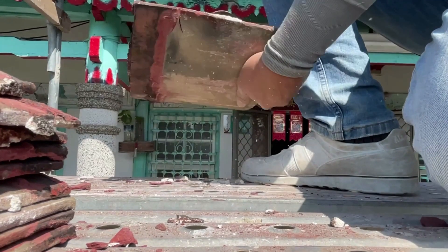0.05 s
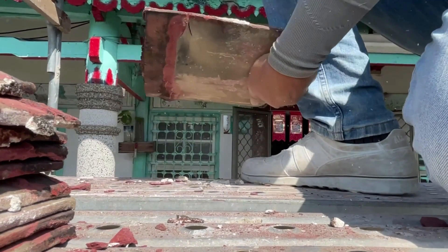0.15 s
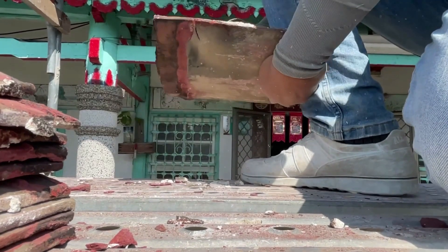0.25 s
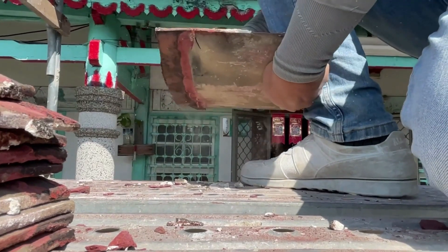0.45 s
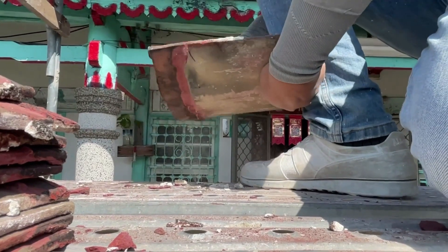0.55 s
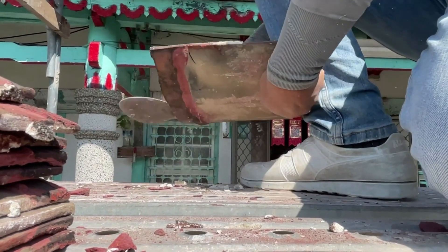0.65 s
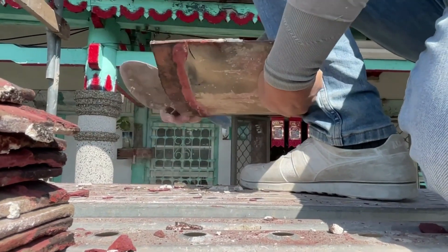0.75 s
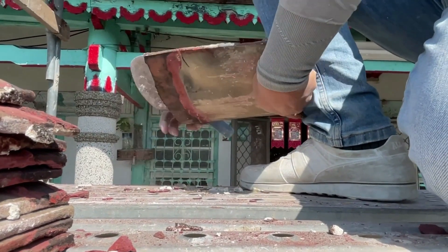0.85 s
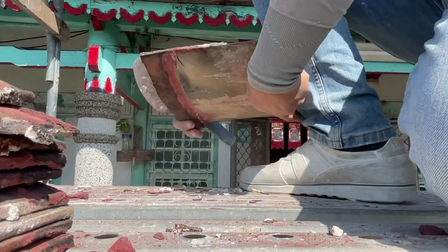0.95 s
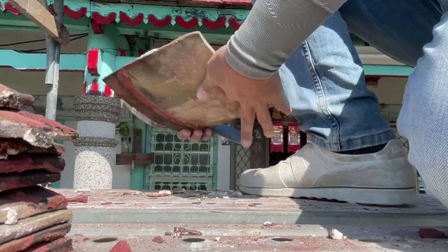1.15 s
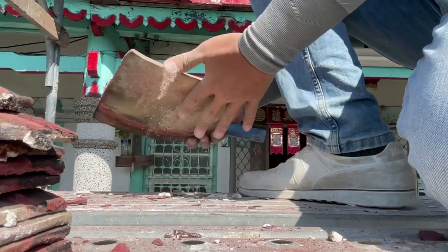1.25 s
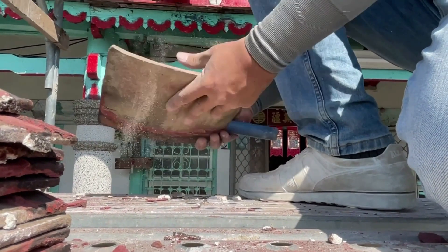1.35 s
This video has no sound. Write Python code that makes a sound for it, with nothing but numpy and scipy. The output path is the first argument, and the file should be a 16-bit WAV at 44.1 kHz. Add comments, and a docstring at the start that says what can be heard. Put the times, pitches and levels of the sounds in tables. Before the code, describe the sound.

On an open rooftop, clay tiles are handled close by, scraping and clacking with a brief thin ring. Then they rub more quietly while dull knocks come from the left, with a slight echo off nearby walls.

```python
"""Handling clay roof tiles

On an open roof, tiles are slid onto one another in the hands, close by. They scrape as grit
catches between them, and they clink: a short damped clack, then the thin ring of the free tile.
A shoe or cloth gives one low, soft scuff. Duller knocks and scrapes come from the left.
Nearby walls echo, over a low rumble of air."""
import sys
import numpy as np
from scipy import signal
from scipy.fft import rfft, irfft, next_fast_len
from scipy.io import wavfile

SR = 44100
rng = np.random.default_rng(int(sys.argv[2]) if len(sys.argv) > 2 else 0)


def log_audio(samples):
    """Write samples as a 16-bit WAV file to the path given in sys.argv[1]."""
    # one column per channel
    frames = np.atleast_2d(samples).T
    # limit to full scale, then quantise
    limited = np.clip(frames, -1, 1)
    pcm = np.round(limited * 32767).astype(np.int16)
    wavfile.write(sys.argv[1], SR, pcm)


N = 61739
FREQS, TIME = np.fft.rfftfreq(2 * N, 1 / SR), np.arange(N) / SR
HIT_GAIN = np.sqrt(0.02 * SR)  # gives a hit the energy of 0.02 s of steady sound


def amp(db):
    """Turns decibels into a number to multiply by."""
    return 10 ** (np.asarray(db) / 20)


def unit_energy(x):
    """Scales a sound so that its energy is 1."""
    return x / np.sqrt(np.sum(x ** 2) + 1e-20)


def look_up(rows, hz, column=1):
    """Reads a table at any pitch, blending between its rows."""
    table = np.transpose(rows)
    return np.interp(np.log(hz + 1), np.log(table[0]), table[column])


def filtered(x, gains):
    """Filters a sound, with one gain for each pitch in FREQS."""
    return irfft(rfft(x, 2 * N) * gains)[..., :N]


def add(mix, start_s, sound):
    """Mixes a stereo sound in at its start time."""
    part = mix[:, round(start_s * SR):][:, :sound.shape[1]]
    part += sound[:, :part.shape[1]]


def stereo_noise(length, shared):
    """Noise that is partly alike on the left and right (shared runs from 0 to 1)."""
    noise = rng.standard_normal((3, length))
    return np.sqrt(shared) * noise[2] + np.sqrt(1 - shared) * noise[:2]


# The tone of the open air: pitch_hz, level_db
AIR_TONE = [(15, -48), (25, -12.5), (86, -4.5), (256, -9.5), (306, -12.5), (418, -13), (513, -33),
            (2240, -43), (5670, -49.5), (9510, -45.5), (12000, -65), (15600, -109), (22000, -120)]
# How the rumble rises and falls: time_s, level_db
RUMBLE_SWELLS = [(0, 1), (.12, 3), (.3, -5.5), (.42, -7.5), (.52, 1.5), (.66, -8.5), (.78, -9.5), (.85, -1),
                 (1.1, -4), (1.4, -5)]


def open_air():
    """Outdoor air: a faint, steady hiss over a low rumble that swells and sinks."""
    air = filtered(stereo_noise(N, shared=0.63), amp(look_up(AIR_TONE, FREQS)))
    air = amp(-53) * air / air.std()
    rumble = filtered(air, 1 / (1 + (FREQS / 500) ** 4))  # the part below 500 Hz
    hiss = air - rumble
    swell = amp(np.interp(TIME, *np.transpose(RUMBLE_SWELLS)))
    return rumble * swell + amp(10) * hiss


# The echo of the roof deck and walls: pitch_hz, level_db, fade_s (time to fall by 60 dB)
ECHO_TONE = [(198, -13, 0.21), (560, -8.5, 0.14), (1440, -19, 0.29), (2570, -16, 0.23), (5400, -14.5, 0.4),
             (9000, -12.5, 0.31)]


def wall_echo(sound):
    """Sound bounces off the deck and walls and blurs, each pitch fading at its own speed."""
    hz, t, bands = signal.stft(stereo_noise(N, shared=0.5), SR, nperseg=256)
    fade_s = look_up(ECHO_TONE, hz, column=2)[:, None]
    fade = np.exp(-np.log(1000) * t / fade_s)
    fade *= np.sqrt(2 * np.log(1000) / fade_s / SR)  # a longer fade adds no energy
    bands = bands * amp(look_up(ECHO_TONE, hz))[:, None] * fade
    tail = signal.istft(bands, SR, nperseg=256)[1][:, :N]
    tail *= np.minimum(TIME / 0.008, 1)  # builds up over 8 ms
    return signal.fftconvolve(sound[None], tail, axes=1)[:, :N]


def ringing(notes):
    """A struck object rings with all its own notes at once, each one dying away."""
    t = TIME[:SR // 2]
    return sum((-1) ** k * amp(db - 60 * t / fade_s) * np.sin(2 * np.pi * hz * t)
               for k, (hz, db, fade_s) in enumerate(notes))


def clack(notes, rattle_db, rattle_fade_s):
    """Rough faces meet: a short ring, plus a rattle that is strongest near the object's notes."""
    t = TIME[:SR // 2]
    freqs = np.fft.rfftfreq(len(t), 1 / SR)
    sharpness = 63
    peaks = sum(1 / (1 + (2 * sharpness * (freqs / hz - 1)) ** 2) for hz, _, _ in notes)
    noise = stereo_noise(len(t), shared=0.7)
    rattle = irfft(rfft(noise) * (1 + amp(2) * peaks), len(t))
    rattle *= np.exp(-np.log(1000) * t / rattle_fade_s)
    return unit_energy(ringing(notes)) + amp(rattle_db) * np.sqrt(2) * unit_energy(rattle)


# Borders of six pitch bands, low to high (thud, body, knock, clack, edge, tick): border_hz
BAND_BORDERS = [170, 400, 950, 1750, 2850, 5400, 10500]


def set_tone(sound, levels_db):
    """Makes a hit or scrape dull or bright by giving each of the six bands its own level."""
    size = next_fast_len(sound.shape[1] // 2 + 2048, True) * 2
    spectrum, hz = rfft(sound, size), np.fft.rfftfreq(size, 1 / SR) + 1
    power = (abs(spectrum) ** 2).mean(0) * 2 / size
    gains_db = [db - 10 * np.log10(power[(hz > low) & (hz < high)].sum())
                for db, low, high in zip(levels_db, BAND_BORDERS, BAND_BORDERS[1:])]
    low_cut_hz, blend_octaves, above_tick_db = 224, 0.18, -14
    curve_db = gains_db[0] - 10 * np.log10(1 + (low_cut_hz / (hz + 10)) ** 6)
    steps_db = np.diff(gains_db + [gains_db[-1] + above_tick_db])
    for border, step_db in zip(BAND_BORDERS[1:], steps_db):
        curve_db += step_db * (1 + np.tanh(2 * np.log2(hz / border) / blend_octaves)) / 2
    # Build the filter so that nothing sounds before the hit itself.
    log_gain = np.log(amp(np.concatenate([curve_db, curve_db[-2:0:-1]])))
    gains = np.exp(signal.hilbert(log_gain).conj())[:len(hz)]
    return irfft(spectrum * gains)[:, :sound.shape[1]]


def scrapes(rows, notes, rattle_db, rattle_fade_s):
    """A sliding face sticks and slips, so grit catches in clumps; each catch is a tiny clack."""
    grits_per_s, grit_spread_db = 2000, 3.5
    slip_s, slip_db = 0.0037, 2.5
    out = np.zeros((2, N))
    for peak_s, rise_s, fall_s, *levels_db in rows:
        width_s = np.where(TIME < peak_s, rise_s, fall_s)
        stroke = np.exp(-abs((TIME - peak_s) / width_s) ** 1.316)
        slips = np.interp(TIME / slip_s, np.arange(N), rng.standard_normal(N))
        size_db = grit_spread_db * np.minimum(rng.exponential(1, N), 3) + slip_db * slips
        catches = rng.random(N) < grits_per_s / SR
        grit = catches * rng.choice([-1, 1], N) * amp(size_db)
        tap = clack(notes, rattle_db, rattle_fade_s)
        rub = signal.fftconvolve((grit * stroke)[None], tap, axes=1)[:, :N]
        out += set_tone(rub, levels_db) * np.linalg.norm(stroke)
    return out


# The notes of the thing knocked on the left: pitch_hz, level_db, fade_s
LEFT_NOTES = [(254.4, -2, .12), (1092.5, 1.5, 0.054), (1298, -8, 0.18), (1503, 4, 0.027), (1956, 2, 0.046),
              (2403, -18, 0.017), (3025, 7, 0.044), (4560, -5, 0.044)]
# Its scrapes: peak_s, rise_s, fall_s, thud_db, body_db, knock_db, clack_db, edge_db, tick_db
LEFT_SLIDES = [(.988, 0.067, 0.028, -62.5, -58.5, -51, -60, -49, -60),
               (1.215, 0.084, 0.067, -54, -49.5, -39.5, -49.5, -55.5, -65)]
# Its knocks: start_s, thud_db, body_db, knock_db, clack_db, edge_db, tick_db
LEFT_KNOCKS = [(.8020, -45.5, -51.5, -35, -34, -44.5, -52.5), (.8150, -45, -46, -43, -53, -72, -73),
               (0.849, -50, -51, -41.5, -49, -51, -53), (1.3659, -58.5, -45.5, -34.5, -42, -53, -51),
               (1.3970, -52, -49, -41, -44, -52, -55)]


def work_on_left():
    """Something off to the left is scraped and knocked, sounding duller than the tiles."""
    out = scrapes(LEFT_SLIDES, LEFT_NOTES, rattle_db=13.5, rattle_fade_s=0.037)
    for start_s, *levels_db in LEFT_KNOCKS:
        knock = clack(LEFT_NOTES, rattle_db=5, rattle_fade_s=0.076)
        add(out, start_s, set_tone(knock, levels_db) * HIT_GAIN)
    return out


# The short notes of the gripped tile: pitch_hz, level_db, fade_s
GRIPPED_NOTES = [(440, -7, 0.065), (528, -4, 0.024), (761.6, -4, 0.056), (1170, 3.5, 0.034),
                 (1480.3, 2.5, 0.054), (1646, 0, 0.032), (2200, -4.5, 0.076), (2451, 0.5, 0.046),
                 (2686, 4, 0.046), (3308, 0, 0.07), (3670, -3, 0.038), (4140, 1, 0.039), (4740, -13, 0.041),
                 (4828, -6.5, 0.067), (5940, -4.5, .04), (6420, -2.5, 0.12), (7500, -27, 0.037),
                 (8480, -3, 0.12), (9420, 2, 0.071)]
# The longer notes of the free tile: pitch_hz, level_db, fade_s
FREE_NOTES = [(427, 0, .23), (1032, -2, .27), (1497, 1, .17), (1881, -4, .25), (2335, -3, .21),
              (2665, -7, .14), (3742, -14, .22), (5045, -9, .36), (6611, -17, .16), (7030, -20, .2),
              (7690, -19, .2), (8382, -13, .12), (8947, -13, .14), (9620, -13, .16)]
# Tile sliding on tile, plus one low, soft scuff of shoe or cloth near 0.5 s:
# peak_s, rise_s, fall_s, thud_db, body_db, knock_db, clack_db, edge_db, tick_db
CLOSE_SLIDES = [(.255, 0.032, 0.03, -55.5, -50, -36.5, -43, -40.5, -42),
                (.314, 0.045, 0.0099, -57, -37, -32, -26, -29.5, -30.5),
                (.428, 0.0076, 0.016, -72, -37.5, -32, -26.5, -33, -30),
                (.505, 0.028, 0.021, -38, -40.5, -47, -64, -50.5, -71),
                (.566, 0.016, 0.018, -48, -45, -34.5, -29, -30.5, -30.5),
                (.988, 0.076, 0.11, -59, -55, -49.5, -46.5, -49, -53.5),
                (1.23, 0.079, 0.067, -77, -66, -71, -65, -58, -56.5)]
# Tile hitting tile: start_s, thud_db, body_db, knock_db, clack_db, edge_db, tick_db, ring_db, rattle_db
TILE_CLINKS = [(0.2071, -48, -53, -32.5, -42.5, -35.5, -37.5, -69, 0),
               (.2880, -56, -43, -47, -28.5, -45, -51, -64, -7),
               (.3002, -65, -35, -42, -43, -54, -56, -70, -7),
               (0.3065, -75, -40, -50, -28.5, -34.5, -49, -52, -8),
               (.3253, -49, -24.5, -22.5, -19.5, -27.5, -28.5, -27.5, 1),
               (.4157, -54, -42, -33.5, -22.5, -33, -36.5, -38.5, 9),
               (.4285, -59, -41, -38.5, -34.5, -35.5, -31.5, -49, -2.5),
               (0.5276, -41.5, -31, -17, -34.5, -36.5, -35, -41, -4),
               (.5490, -69, -40, -44, -46.5, -29, -53, -58, 0),
               (0.5721, -40.5, -23.5, -25.5, -27, -23, -35.5, -29.5, 1),
               (0.7339, -70, -61, -59.5, -58, -55, -63, -49, 21)]


def handling_tiles():
    """Tiles scrape and hit: the gripped one clacks, the free one rings. Shoe or cloth scuffs once."""
    out = scrapes(CLOSE_SLIDES, GRIPPED_NOTES, rattle_db=9.5, rattle_fade_s=0.017)
    for start_s, *levels_db, ring_db, rattle_db in TILE_CLINKS:
        hit = set_tone(clack(GRIPPED_NOTES, rattle_db, rattle_fade_s=0.041), levels_db)
        ring = amp(ring_db) * unit_energy(ringing(FREE_NOTES))
        add(out, start_s, (hit + ring) * HIT_GAIN)
    return out


def placed(sound, left_lead_rad, left_louder_db):
    """Gives a sound a direction: one side hears it earlier or louder than the other."""
    left = amp(left_louder_db / 2)
    right = amp(-left_louder_db / 2) * np.exp(-1j * left_lead_rad)
    gains = np.array([left, right])
    return filtered(sound, gains / np.sqrt(np.mean(abs(gains) ** 2, axis=0)))


# How the close sounds reach the two sides: pitch_hz, left_lead_rad, left_louder_db
CLOSE_DIRECTION = [(202, 0.73, 2.5), (490, -0.03, 4), (760, 1.42, 3.5), (1160, 0.66, 3), (1620, 0.95, -1.5),
                   (2290, 0.27, -3), (2480, 2, -5.5), (3460, 2.5, -5.5), (4700, 1.95, -2.5),
                   (6500, 1.66, 0.5), (8330, -1.56, 0)]
# How the work on the left reaches them: pitch_hz, left_louder_db
WORK_DIRECTION = [(250, -2), (700, 15), (1400, -1.5), (3000, -2), (7000, 2.5)]


def scene():
    """Mixes the close tile handling, the work on the left, their echo and the open air."""
    close, work = handling_tiles(), work_on_left()
    work_lead_s = 0.00027  # the work reaches the left side first
    direct = placed(close, look_up(CLOSE_DIRECTION, FREQS), look_up(CLOSE_DIRECTION, FREQS, column=2))
    direct += placed(work, 2 * np.pi * FREQS * work_lead_s, look_up(WORK_DIRECTION, FREQS))
    echo = wall_echo((close + amp(9.5) * work)[0])  # the work gets more echo than the tiles
    return direct + echo + open_air()


def record(dry):
    """Cuts off the highest treble, above 11700 Hz."""
    treble_cut = signal.firwin(255, 11700, window=("kaiser", 8), fs=SR)
    return signal.oaconvolve(dry, treble_cut[None], "same")


dry = scene()
out = record(dry)
log_audio(out)
```